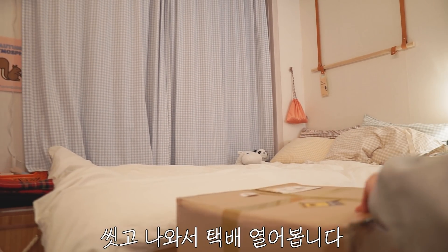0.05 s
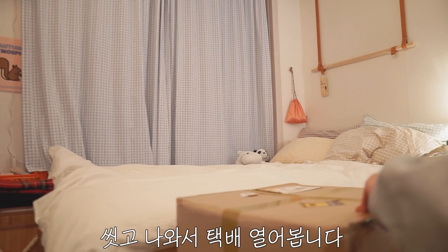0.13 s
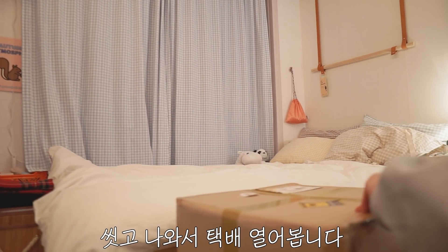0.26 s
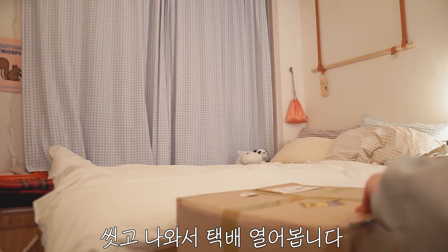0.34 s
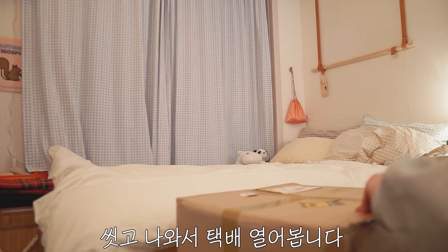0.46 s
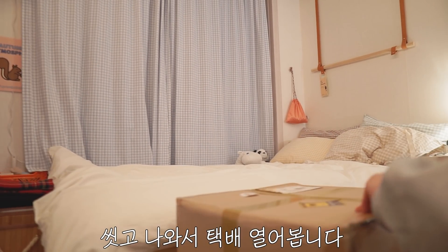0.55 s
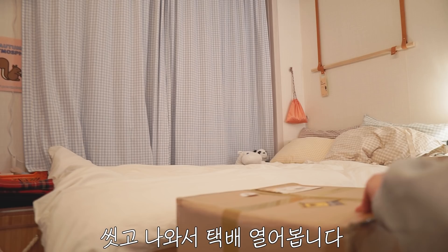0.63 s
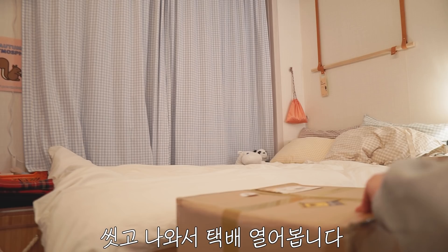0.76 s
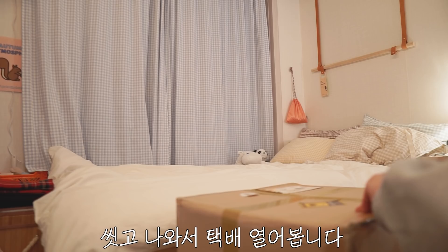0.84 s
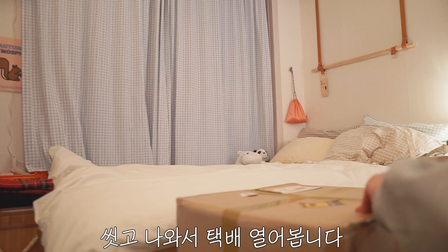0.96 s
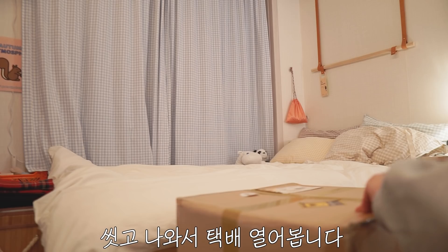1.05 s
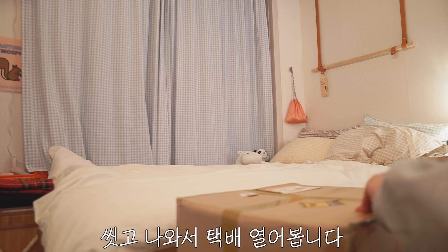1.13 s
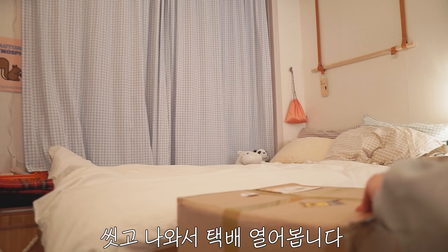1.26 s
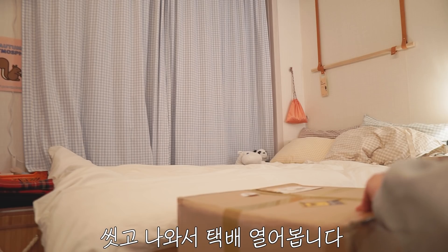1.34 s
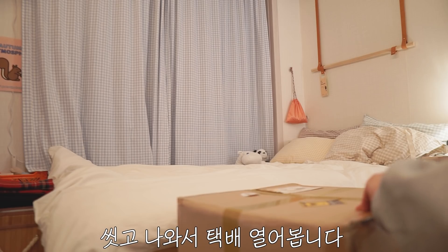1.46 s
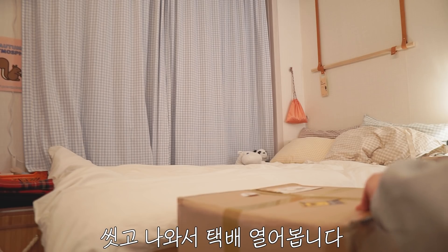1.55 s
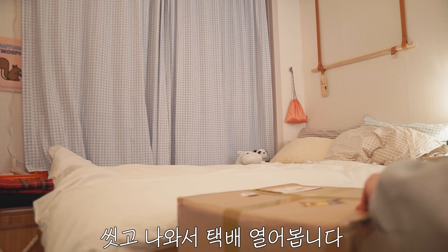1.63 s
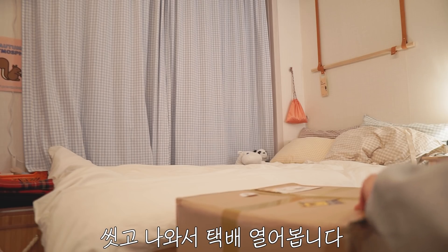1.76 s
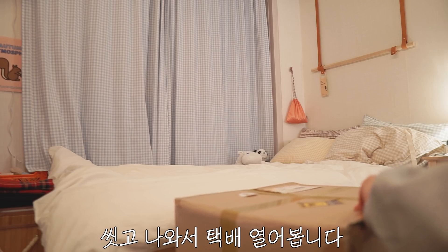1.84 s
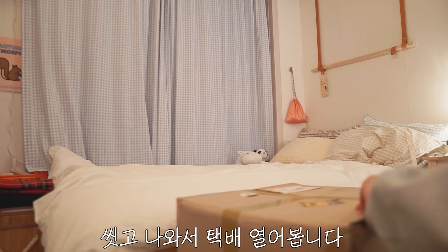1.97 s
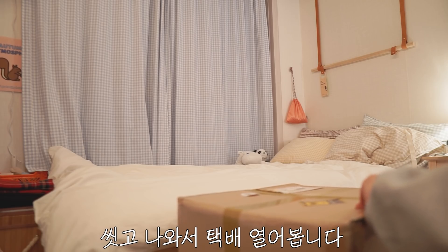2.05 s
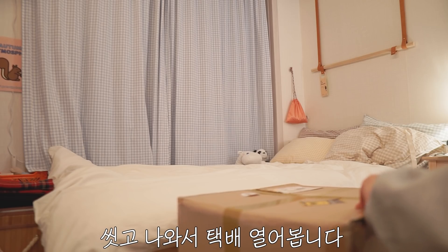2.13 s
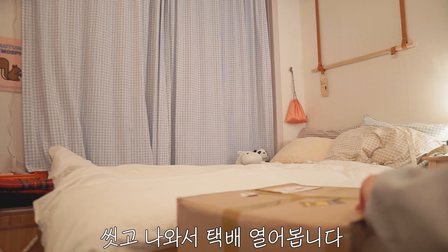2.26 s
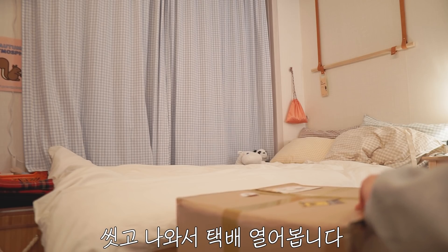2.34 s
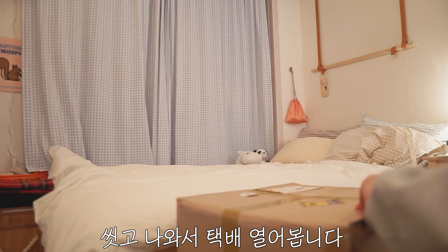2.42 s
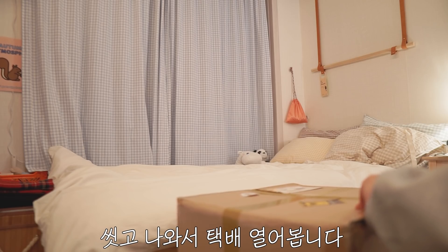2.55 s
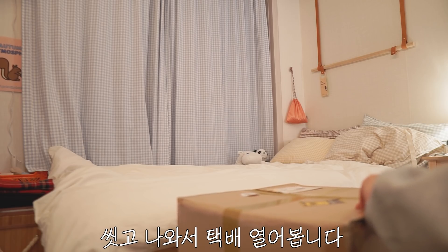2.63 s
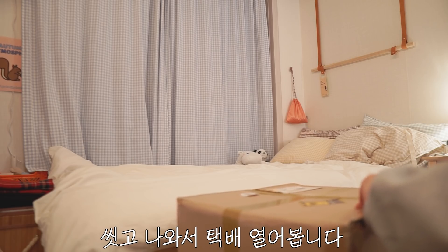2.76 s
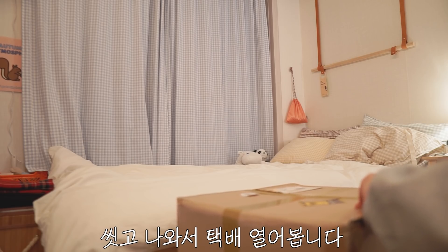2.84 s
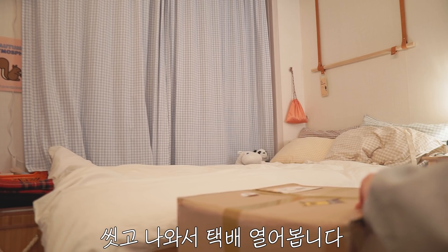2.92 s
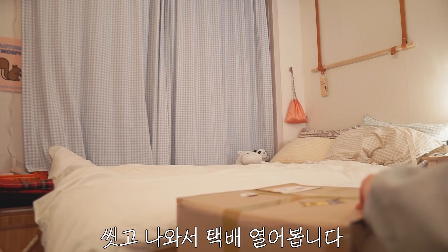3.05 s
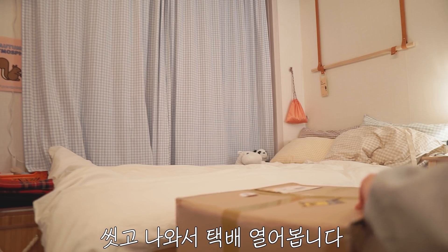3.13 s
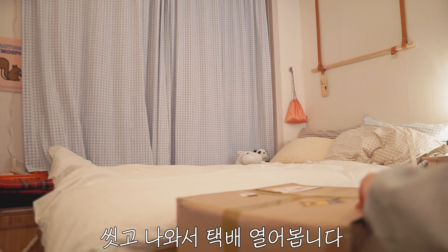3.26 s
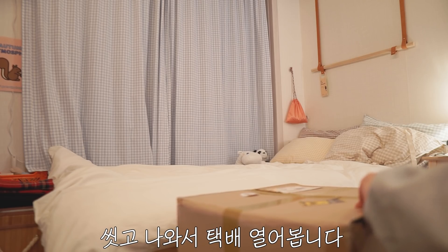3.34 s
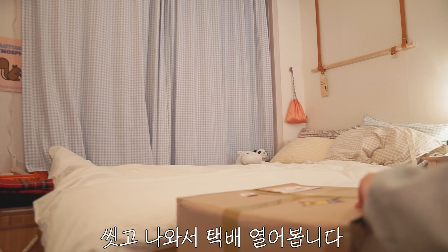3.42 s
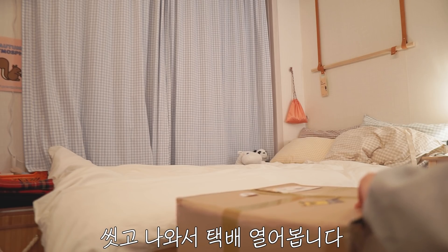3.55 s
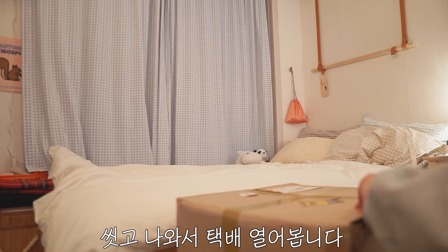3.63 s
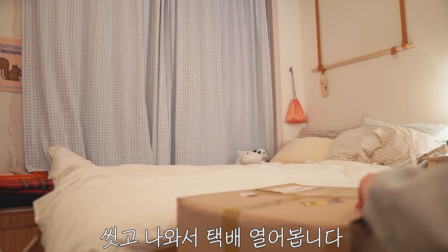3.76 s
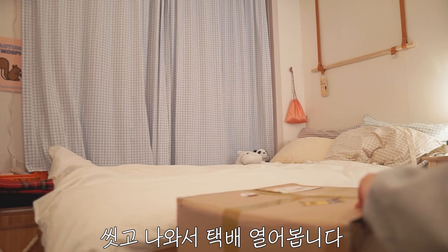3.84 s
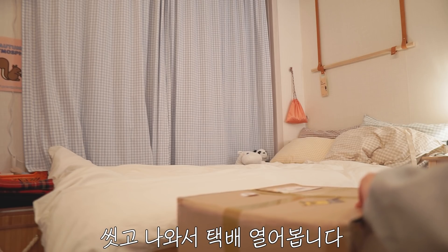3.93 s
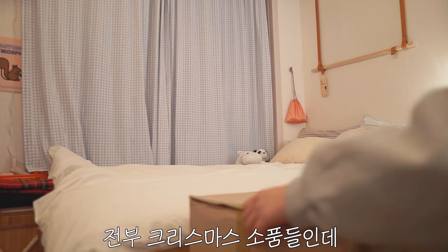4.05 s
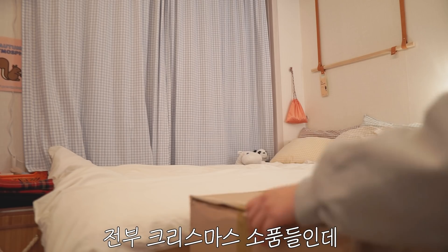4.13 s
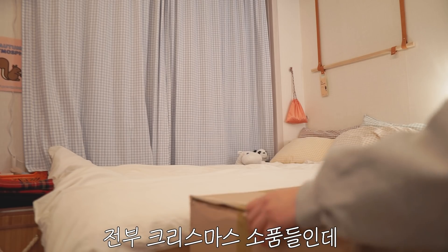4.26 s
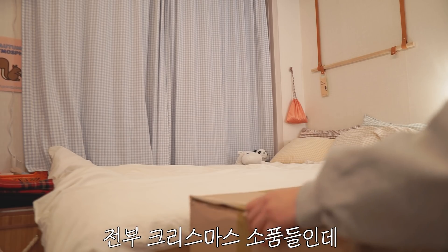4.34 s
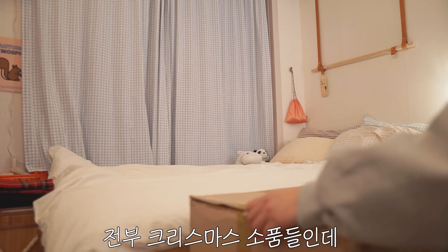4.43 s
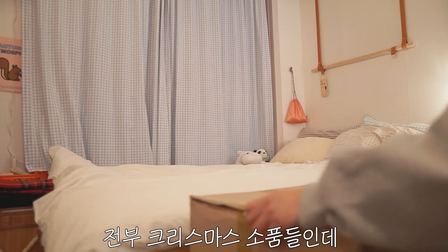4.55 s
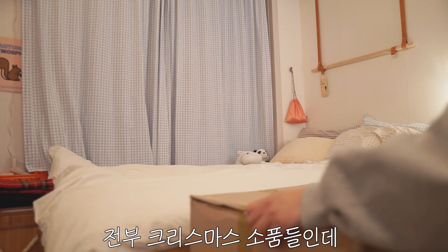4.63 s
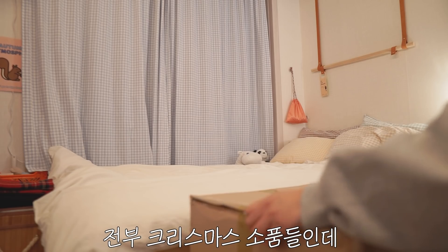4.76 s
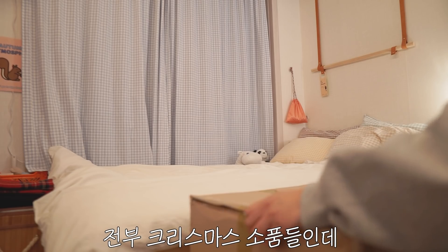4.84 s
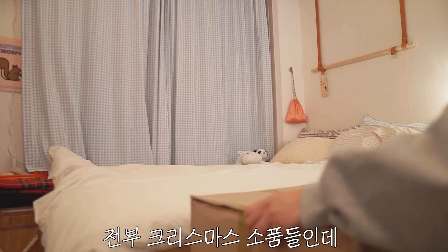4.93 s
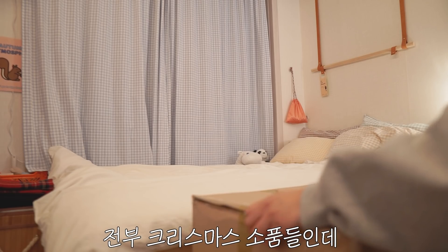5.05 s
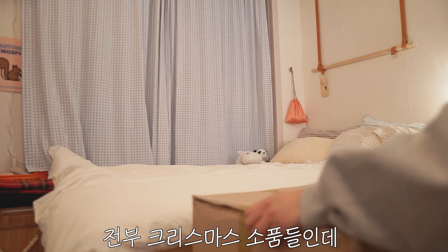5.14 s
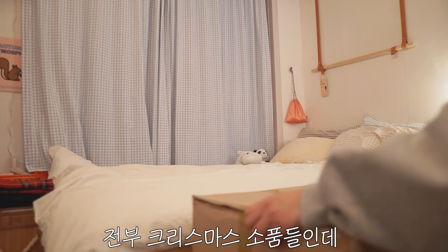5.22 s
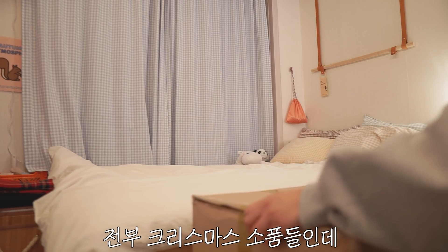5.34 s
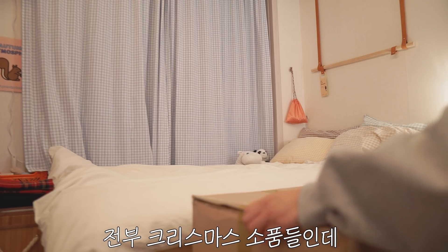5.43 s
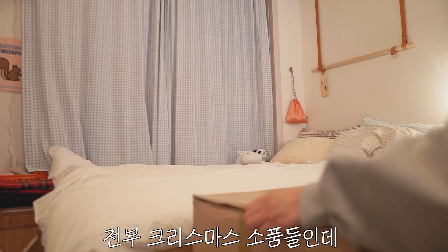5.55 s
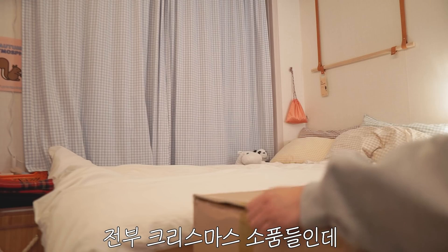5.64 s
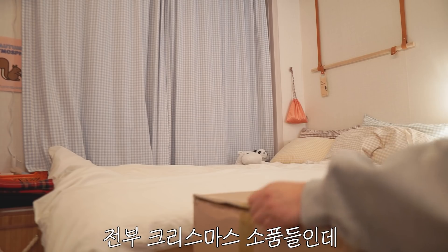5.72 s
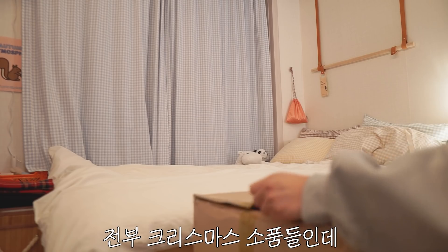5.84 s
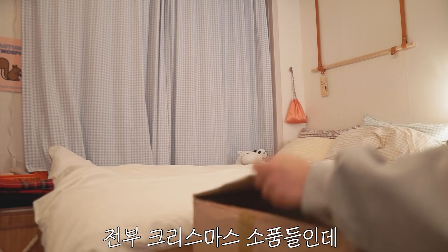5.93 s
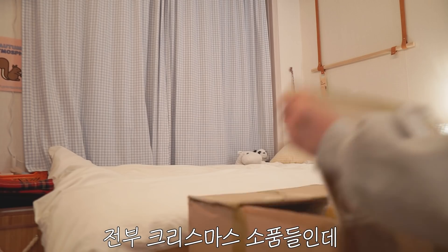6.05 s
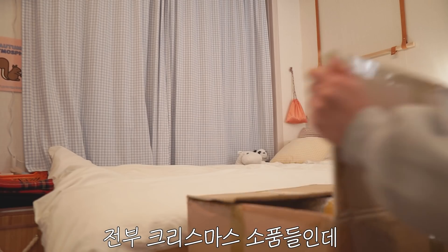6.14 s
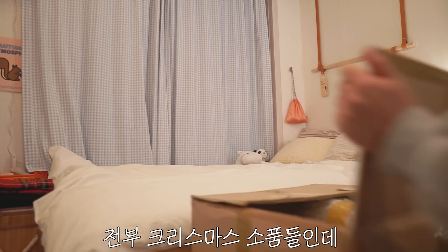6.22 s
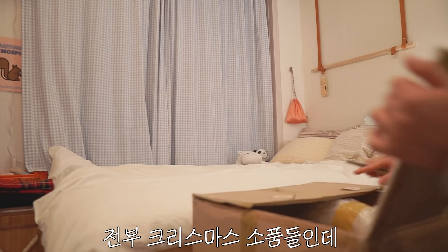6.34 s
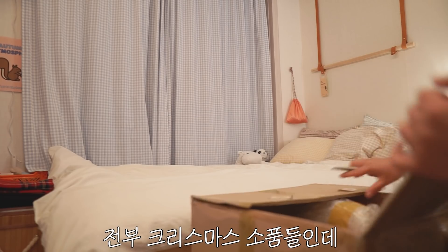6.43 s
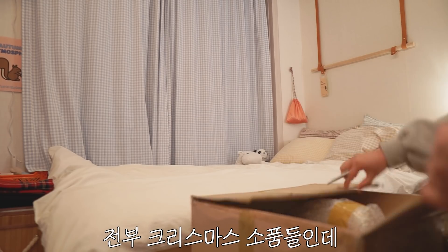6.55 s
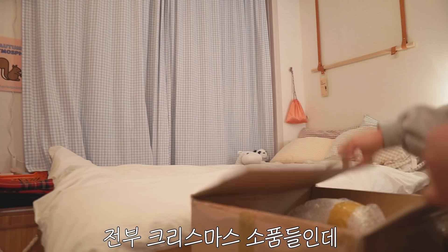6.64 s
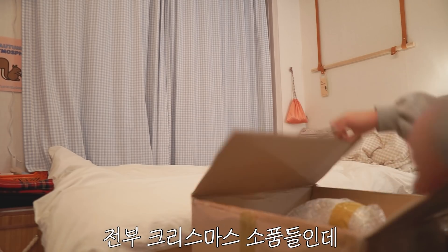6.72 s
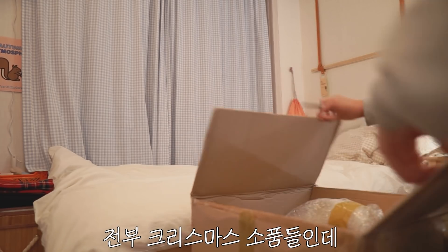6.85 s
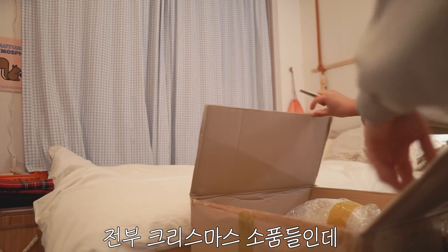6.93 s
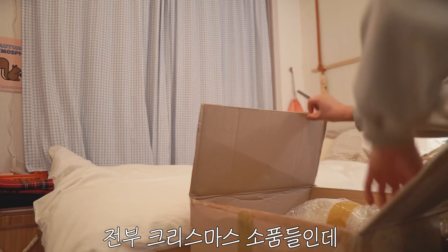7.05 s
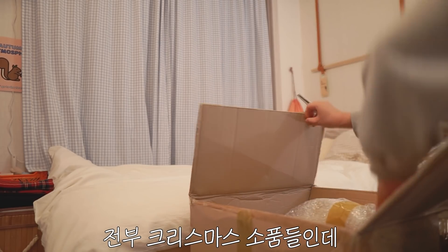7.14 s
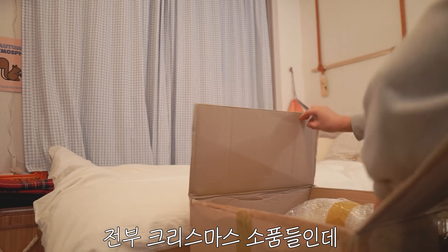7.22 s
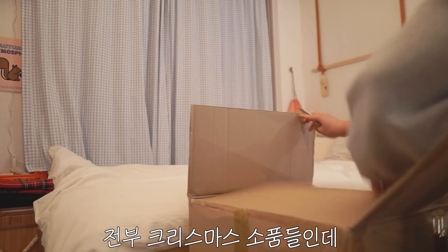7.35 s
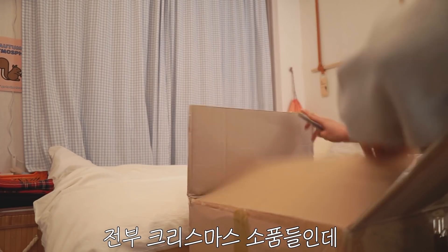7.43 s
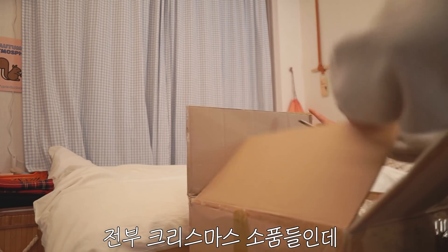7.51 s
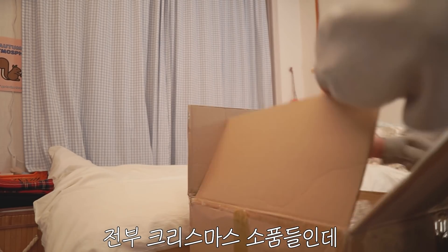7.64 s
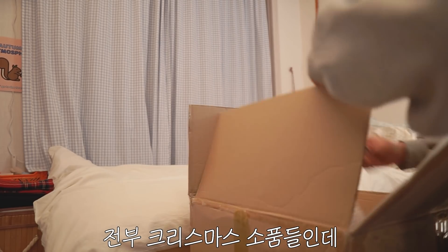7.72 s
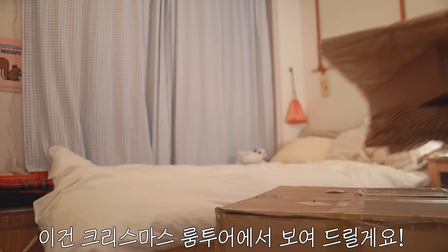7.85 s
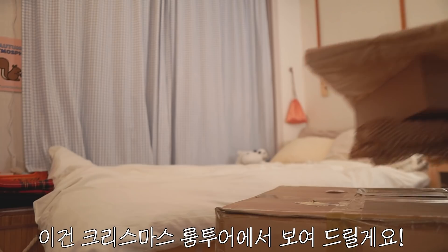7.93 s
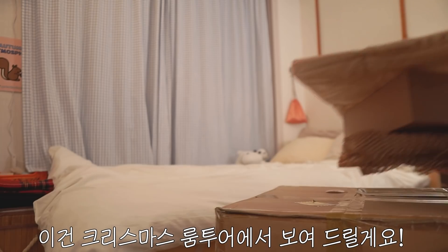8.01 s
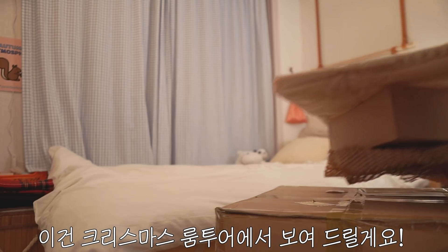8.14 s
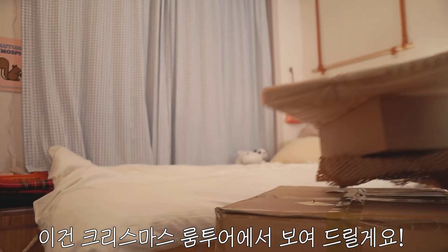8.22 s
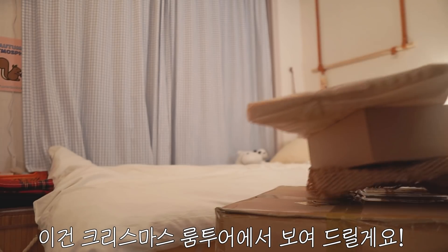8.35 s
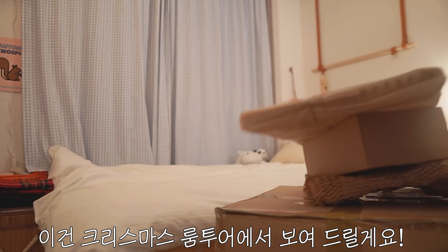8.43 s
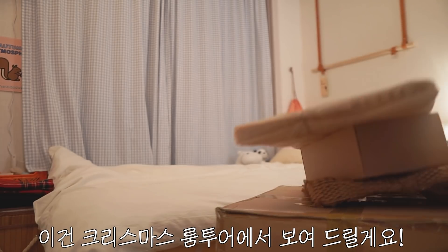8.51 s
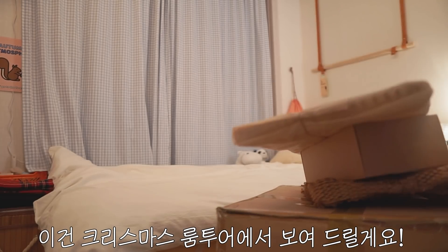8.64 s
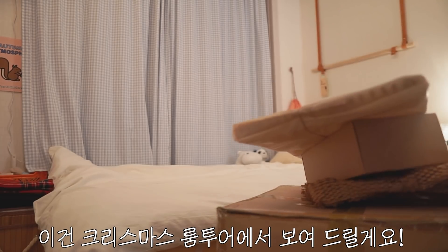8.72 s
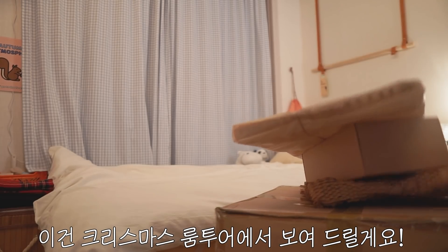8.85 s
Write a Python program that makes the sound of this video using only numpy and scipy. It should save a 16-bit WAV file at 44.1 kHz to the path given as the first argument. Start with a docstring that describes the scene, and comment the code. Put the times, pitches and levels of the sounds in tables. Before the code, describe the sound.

Close cardboard box opening: plastic clicks, scattered knocks and light rubbing, snapping fibres, hollow flap thumps, a loud board slide, then quiet crisp paper rustle.

```python
"""Cutting open a cardboard box

A taped box is cut open on a bed, close to a camera on whose right it stands: a knife's slider clicks out, tape and
fibres snap, flaps knock and boom, board slides on board; late on, tails stop at once and paper packing rustles.
Contacts are noise bursts through resonances, with wall echoes and a tail in a small soft room; rubbing is
gritty noise on drag curves; shaped noise makes the hush, with a faint quick ticking at two pitches."""
import sys
import numpy as np
from scipy import signal
from scipy.fft import rfft, irfft, next_fast_len
from scipy.io import wavfile
from scipy.ndimage import uniform_filter1d, map_coordinates

SR = 44100
rng = np.random.default_rng(int(sys.argv[2]) if len(sys.argv) > 2 else 0)


def unload_audio(sound):
    """Save the sound as a 16-bit wav file, at the path given as the first command line argument."""
    columns = np.transpose(np.atleast_2d(sound))
    # keep every value between -1 and 1, then stretch to whole-number steps
    steps = np.round(np.clip(columns, -1, 1) * 32767)
    wavfile.write(sys.argv[1], SR, steps.astype(np.int16))


N = 391608

# Resonances of the box and its air: [f/Hz, width/Hz, relative level/dB]
BODY_MODES = [(42, 18, -9.5), (136, 38, 4.5), (232, 55, 1.5), (299, 52, 4), (451, 230, -6)]
# Resonances of the flaps: [f/Hz, width/Hz, relative level/dB]
PANEL_MODES = [(567, 390, -0.5), (846, 93, 5), (1098, 344, -1), (1560, 1330, -12.5)]
# Resonances of the fibres: [f/Hz, width/Hz, relative level/dB]
FIBRE_MODES = [(7470, 3800, 14.5), (14750, 5200, 15)]


def amp(db):
    """Level definition: 20 dB for each factor of ten in amplitude."""
    return 10 ** (np.asarray(db) / 20)


def unit(x):
    """Normalization to unit root-mean-square amplitude."""
    return x / np.sqrt(np.mean(x ** 2) + 1e-20)


def along(points, hz):
    """Interpolation of (f/Hz, value) points on a logarithmic frequency axis."""
    f, value = np.transpose(points)
    return np.interp(np.log(hz + 1), np.log(f + 1), value)


def filtered(x, response):
    """Linear filtering: the spectrum of x times a complex response of frequency."""
    size = next_fast_len(N + SR // 2)
    spectrum = rfft(x, size) * response(np.fft.rfftfreq(size, 1 / SR))
    return irfft(spectrum, size)[..., :N]


def modes(table, order=1):
    """Modal superposition: causal resonances keeping white-noise power; a higher order steepens the skirts."""
    def response(f):
        h = 0
        for k, (centre, width, db) in enumerate(table):
            resonance = 1j * f * width / (centre * centre - f * f + 1j * f * width)
            h = h + (-1) ** k * amp(db) * resonance  # alternate signs
        return h ** order / np.sqrt(np.mean(np.abs(h) ** (2 * order)))
    return response


def wobble(rate):
    """Slow modulation: a smooth random curve with rate knots a second."""
    knots = rng.standard_normal(int(N * rate / SR) + 4)
    return map_coordinates(knots, [np.arange(N) * rate / SR])


def hush():
    """Filtered noise: a shaped, gently wavering hush, with impulses exciting two resonances as ticks."""
    # Spectrum of the hush: [f/Hz, relative level per Hz/dB]
    air_spectrum = [(15, -49), (25, -18), (137, 4.5), (223, -10.5), (405, -9), (911, -7), (1480, -13),
                    (2000, -11.5), (2350, -19), (2550, -7.5), (2840, -17.5), (14000, -27), (16000, -30)]
    # Low tick resonance: [f/Hz, width/Hz, relative level/dB]
    low_mode = [(2060, 310, 0)]
    # High tick resonance: [f/Hz, width/Hz, relative level/dB]
    high_mode = [(2570, 140, 0)]
    # Onsets of the stronger high ticks: [t/s]
    tick_times = [0.3707, .392, .4519, .4804, .6868, 2.1035, 2.1864, 2.271, 2.52, 3.442, 3.7875]
    air = unit(filtered(rng.standard_normal((2, N)), lambda hz: amp(along(air_spectrum, hz))))
    air_db = -59 + 0.94 * wobble(2.7)
    # Random ticks: about 20 low and 3 high a second; the low ones are uneven in level
    scatter_db = 3 * rng.standard_normal(N)
    low = (rng.random(N) < 20 / SR) * amp(-37 + scatter_db)
    high = (rng.random(N) < 3 / SR) * amp(-51)
    high[np.round(np.multiply(tick_times, SR)).astype(int)] = amp(-32.5)
    ticking = filtered(low, modes(low_mode)) + filtered(high, modes(high_mode, order=2))
    return amp(air_db) * air + ticking * [[1], [.6]]


def strikes(times, levels_db, hard_db, crack, t60, room_db, rise, spots_hz=None, sharp=4):
    """Impact and reverberation: a short crack, its wall echoes and a decaying tail, as mid and side noise.

    crack and t60 are the times in s for the crack and the tail to fall by 60 dB.
    """
    # Reflections off near walls: [delay t/s, level re crack/dB]
    reflections = [(.0078, -6), (.012, -9), (.0165, -9), (.027, -12)]
    tails_stop = 7.92  # s; contacts before this are silenced here, echoes and all
    out, t = np.zeros((2, N + SR)), np.arange(int(.4 * SR)) / SR
    crack_decay = amp(-60 * t / crack)
    tail_decay = amp(room_db - 60 * t / t60)
    for k, (s, db) in enumerate(zip(times, levels_db)):
        start = round(s * SR)
        keep = len(t) if s > tails_stop else min(len(t), round(tails_stop * SR) - start)
        noise = rng.standard_normal((3, len(t)))
        # Hardness strengthens the crack and quickens the swell of the tail
        blow = amp(hard_db[k]) * np.sign(noise[2]) * crack_decay
        swell = 1 - np.exp(-t * amp(0.63 * hard_db[k]) / rise)
        sound = noise[:2] * tail_decay * swell + blow * [[1], [0]]
        for n, (delay, echo_db) in enumerate(reflections):  # walls answer from alternate sides
            sound += amp(echo_db) * np.roll(blow, round(delay * SR)) * [[1], [(-1) ** n]]
        if spots_hz is not None:  # the struck spot rings in one band of its own
            gain = np.sqrt(SR * sharp / (np.pi * spots_hz[k]))
            b, a = signal.iirpeak(spots_hz[k], sharp, SR)
            sound = gain * signal.lfilter(b, a, sound)
        out[:, start:start + keep] += amp(db) * sound[:, :keep]
    return out[:, :N]


def snaps():
    """Impulsive excitation of plastic: very short clicks with little bass, so wall echoes stand apart."""
    # Plastic clicks: [t/s, push level/dB, crisp top re push/dB, hardness/dB]
    clicks = [(0.0034, -19, -2.5, 1.5), (0.0841, -19.5, -2.5, 3.5), (0.168, -19.5, -3, 3),
              (5.7278, -13, -9, 3), (5.781, -17.5, -5, 4), (5.824, -16, -5, 2), (5.8602, -12.5, -10, 4.5),
              (5.915, -10, -9, 3.5), (8.4251, -24, -12.5, 9)]
    # Resonances of the plastic: [f/Hz, width/Hz, relative level/dB]
    plastic_modes = [(2665, 480, 3.5), (3210, 213, 9), (3950, 1340, 3.5), (6600, 1650, 1)]
    s, db, top, hard = np.transpose(clicks)
    click = .004  # s to fall by 60 dB
    ring = strikes(s, db + 1.5, hard, crack=click, t60=0.23, room_db=-14.5, rise=0.0027)
    crisp = strikes(s, db + top + 2.5, hard, crack=click, t60=0.21, room_db=-12.0, rise=0.003)
    return filtered(ring, modes(plastic_modes, order=2)) + filtered(crisp, modes(FIBRE_MODES, order=2))


def contacts():
    """Modal excitation: each contact drives five parts; lower parts are pushed longer and mostly ring longer."""
    # Contacts on the box: [t/s, push level/dB, boom re push/dB, crisp top re push/dB, struck spot f/Hz,
    # hardness/dB]
    hits = [(0.282, -35, -21, -28, 3720, -1.5), (0.435, -43, -28, -22, 4090, -1),
            (0.505, -33, -14.5, -10.5, 3770, 1.5), (0.857, -26.5, -36, -12.5, 2220, -4.5),
            (1.189, -32.5, -25, -47, 1280, -1), (1.237, -34, -14.5, -21, 886, -8),
            (1.35, -26.5, -15, -37, 1270, -1), (1.492, -49, -16, 8, 790, -3),
            (1.526, -30, -21, -11.5, 2100, 0.5), (1.627, -38, -12, -5, 2520, -2),
            (1.738, -27, -10, -3, 1100, -7.5), (1.779, -15.5, -6, -23.5, 2350, -4),
            (1.901, -27, -5, -20, 805, -6), (2.356, -39, -24, -31, 630, 1.5),
            (2.522, -44, -5.5, -20, 813, -11), (2.768, -23, -15.5, -21, 1070, 1.5),
            (2.88, -21.5, -23, -14.5, 830, 0), (2.964, -25.5, -9, -33, 1300, -17),
            (3.171, -19, -13, -4.5, 1190, -3.5), (3.178, -18, -45, -10, 2320, 4),
            (3.32, -40, -17, -8, 2350, -7), (3.482, -29.5, -17.5, -26, 1220, -1),
            (3.609, -38.5, -16, -23, 4000, -7), (3.633, -28, -20, -27, 1180, -1.5),
            (3.884, -36.5, -19, -51, 1200, -1), (4.121, -38, -15, -18, 920, 1.5),
            (4.315, -39.5, -48, -12, 2660, 0.5), (4.403, -39.5, -32, -30, 3190, 3),
            (4.5, -26.5, -32, -2.5, 1960, -8), (4.582, -25.5, -25, -24, 880, 6),
            (4.623, -29, -11.5, -42, 840, 1.5), (4.804, -28, -27, -11.5, 756, -12),
            (4.911, -24.5, -15.5, -21, 706, 3.5), (4.953, -28, -35, -35, 2610, 3.5),
            (5.163, -23.5, -7, -12, 586, -5.5), (5.26, -14.5, -12.5, -31, 950, -8),
            (5.367, -14.5, -17, -33, 750, -6.5), (5.593, -20.5, -14, -20, 800, 2),
            (5.667, -22.5, -28, -36, 1800, 4), (5.861, -24, -7.5, -4.5, 766, 6),
            (5.947, -14, -1, -7, 800, -2.5), (5.96, -16.5, -26, -1.5, 630, -4),
            (6.029, -13, 1, -12.5, 805, -6.5), (6.134, -24, 1.5, -16, 780, 4.5),
            (6.263, -25.5, -11, -19, 795, -16), (6.527, -37, -15, -2.5, 1380, 4.5),
            (6.612, -22.5, -11, -33, 690, 2), (6.797, -27, -11, -29, 4370, 0.5),
            (6.903, -28, -7, -19, 1550, -6.5), (7.262, -32, -10, -10.5, 4400, -3),
            (7.289, -41.5, 2.5, -23, 603, 4.5), (7.404, -9, -5, -36, 1540, -8),
            (7.455, -13, -8, -5.5, 3860, -4), (7.581, -20, -11, 2.5, 2060, -6),
            (8.001, -47, -28, -8, 880, 0), (8.511, -35, -4, -15, 2160, 3)]
    # Resonances of tape and board edges: [f/Hz, width/Hz, relative level/dB]
    edge_modes = [(1997, 1010, 3.5), (3400, 930, 7.5), (4236, 1740, 8), (5620, 4800, 1)]
    s, db, boom, top, hz, hard = np.transpose(hits)
    rap = -7 + 0.15 * boom  # the panels answer a share of the boom
    bite = .3 * top  # a dull contact also wakes the edges less
    snap = .005  # s for the crack at edge and fibres to fall by 60 dB
    spot_db = np.where(hz < 1900, db - 6.5, db - 8.5)
    body = strikes(s, db + boom + 0.5, hard, crack=0.05, t60=0.29, room_db=-4.5, rise=0.0033)
    panel = strikes(s, db + rap - 6.5, hard, crack=0.037, t60=0.32, room_db=-5.0, rise=0.0051)
    spot = strikes(s, spot_db, hard, crack=0.016, t60=0.22, room_db=-8, rise=0.0016, spots_hz=hz, sharp=3.8)
    edge = strikes(s, db + bite + 3.5, hard, crack=snap, t60=0.22, room_db=-12, rise=0.0035)
    crisp = strikes(s, db + top + 7.5, hard, crack=snap, t60=0.18, room_db=-13, rise=0.0056)
    low = filtered(body, modes(BODY_MODES)) + filtered(panel, modes(PANEL_MODES))
    high = filtered(edge, modes(edge_modes, order=2)) + filtered(crisp, modes(FIBRE_MODES, order=2))
    return low + spot + high


def grit(rate, spread_db, life, grains_db):
    """Stick-slip friction: smooth noise made rough by uneven slips, rate a second, falling 60 dB in life s."""
    sizes_db = spread_db * np.minimum(rng.standard_exponential(N), 3)
    slips = (rng.random(N) < rate / SR) * amp(sizes_db)
    t = np.arange(SR // 20) / SR
    bumps = unit(signal.fftconvolve(slips, amp(-60 * t / life))[:N])
    return unit(rng.standard_normal((2, N)) * (1 + amp(grains_db) * bumps))


def patches(x, depth_db):
    """Time-varying coupling: the contact wanders over the board, so bands swell and fade by chance."""
    z = signal.stft(x, nperseg=512)[2]
    field = rng.standard_normal(z.shape[1:])
    field = uniform_filter1d(field, size=7, axis=0)  # smooth over frequency
    field = uniform_filter1d(field, size=9, axis=1)  # smooth over time
    return signal.istft(z * amp(depth_db * unit(field)), nperseg=512)[1][:, :N]


def friction(tables, rough_db, grains_db, crackle_db, body_db, panel_db, fibre_db):
    """Friction-driven vibration: one drag curve shakes body and panels, scrapes board and frays fibres."""
    # Spectrum of the scrape: [f/Hz, relative level per Hz/dB]
    scrape_spectrum = [(760, -8.5), (1300, -0.5), (2130, 3.5), (3510, -2), (4170, -2), (4830, -6),
                       (6000, -7), (7800, -14), (13200, -120)]
    # Spectrum of the fraying fibres: [f/Hz, relative level per Hz/dB]
    fizz_spectrum = [(2650, -27.5), (4500, 1.5), (4920, -10.5), (7030, -5.5), (8200, -2), (13900, -5.5),
                     (16000, -8)]
    off, edge = -110, .0001  # dB between bouts; s to switch
    bouts = [[(t[0][0] - edge, off, 0), *t, (t[-1][0] + edge, off, 0)] for t in tables]
    rows = np.concatenate(bouts)
    scrape_db, weight_db = (np.interp(np.arange(N) / SR, rows[:, 0], c) for c in rows[:, 1:].T)
    rumble_db = scrape_db + body_db + weight_db
    groan_db = scrape_db + panel_db + 0.83 * weight_db  # panels take a share of the weight
    fizz_db = scrape_db + fibre_db + 0.26 * (scrape_db + 43)  # fizz outgrows the scrape
    drag = amp(rough_db * (wobble(25) + 0.17 * wobble(70)))
    rumble = unit(filtered(grit(45, 1.6, 0.078, grains_db), modes(BODY_MODES)))
    groan = unit(filtered(grit(120, 4.1, 0.0088, grains_db), modes(PANEL_MODES, order=2)))
    rasp = patches(grit(150, 4, 0.017, grains_db), depth_db=3)
    scrape = unit(filtered(rasp, lambda hz: amp(along(scrape_spectrum, hz))))
    fibres = grit(200, 5, .006, grains_db)
    fibres += amp(crackle_db) * grit(35, 4.7, 0.0056, 5.9)  # a few break sharply
    fizz = unit(filtered(fibres, lambda hz: amp(along(fizz_spectrum, hz))))
    low = amp(rumble_db) * rumble + amp(groan_db) * groan
    high = amp(scrape_db) * scrape + amp(fizz_db) * fizz
    return drag * (low + high)


def handling():
    """Rough sliding friction: hands and board rub in bouts with a strongly uneven drag."""
    # One curve for each bout: [t/s, scrape level/dB, weight/dB]
    rubs = [
        [(1.18, -70, 0), (1.382, -55.5, 2), (1.636, -68.5, -2), (1.87, -45, 9), (2.076, -55.5, -3),
         (2.15, -67, 2)],
        [(2.72, -58.5, 1), (2.796, -49.5, 3.5), (2.932, -52, 5), (3.15, -60, 3)],
        [(3.75, -65.5, 4), (3.902, -66.5, 8), (4.1, -65.5, 2), (4.122, -51.5, 2.5), (4.366, -63, -3),
         (4.6, -43.5, -9), (4.676, -55, 8.5), (4.962, -45, 5), (5.034, -47.5, 3), (5.288, -41, 3),
         (5.33, -45, 6.5), (5.42, -38, 7.5), (5.58, -52.5, -1)],
        [(5.583, -48, -1), (5.68, -46.5, 4), (5.84, -24, -8), (5.93, -46.5, 3), (6.03, -34, 2), (6.2, -45, -2),
         (6.42, -47.5, -1), (6.6, -47.5, 3), (6.74, -54, -2), (6.9, -50, 1), (7.0, -37.5, 1), (7.07, -52, -2.5),
         (7.22, -52.5, -6), (7.3, -47.5, 0)],
    ]
    return friction(rubs, rough_db=3.0, grains_db=-7.0, crackle_db=-5.5, body_db=-5, panel_db=-6, fibre_db=-7.5)


def crackles():
    """Brittle fracture: single fibres break as dry bright ticks that hardly wake the room."""
    # Breaking fibres: [t/s, push level/dB]
    breaks = [(4.634, -48), (4.6978, -35), (5.6064, -40), (5.6467, -17), (5.693, -33), (6.459, -21.5),
              (6.65, -26), (6.757, -31), (8.4068, -35), (8.544, -21.5), (8.6326, -19.5), (8.7046, -22.5),
              (8.7693, -26), (8.796, -23.5), (8.829, -17.5)]
    s, db = np.transpose(breaks)
    ticks = strikes(s, db - 1.5, 0 * s, crack=0.0018, t60=0.21, room_db=-21, rise=0.00093)
    return filtered(ticks, modes(FIBRE_MODES, order=2))


def slide():
    """Surging sliding friction: board slides briefly and loudly on board, in uneven surges."""
    # Curve of the slide: [t/s, scrape level/dB, weight/dB]
    stroke = [(7.28, -57, -12), (7.316, -49, -6), (7.336, -36.5, 4.5), (7.432, -30, 3), (7.442, -36, 6),
              (7.514, -20, -17), (7.566, -37, -10), (7.608, -26, -15), (7.826, -28, -29),
              (7.906, -35, -7.5), (7.92, -41.5, -12)]
    return friction([stroke], rough_db=0.0, grains_db=-16, crackle_db=-9, body_db=-5.5, panel_db=-4.5,
                    fibre_db=-4.0)


def paper():
    """Light sliding friction: paper packing rustles with little random roughness in its drag."""
    # Curve of the rustle: [t/s, scrape level/dB, weight/dB]
    rustle = [(7.925, -55.5, 0), (8.171, -61, 0), (8.391, -55, 0), (8.475, -48, 0), (8.601, -40.5, 0),
              (8.88, -45.5, 0)]
    return friction([rustle], rough_db=.9, grains_db=-10, crackle_db=-4, body_db=-4, panel_db=-5.5,
                    fibre_db=-6.5)


def spread(both, lead):
    """Stereo level and time cues: mid and side become two ports, most alike in the bass; left leads by lead s."""
    # Likeness of the ports: [f/Hz, left-right correlation]
    likeness = [(140, .999), (250, 0.99), (500, 0.79), (1000, 0.53), (2000, 0.72), (4000, 0.14),
                (8000, 0.24)]
    # Balance of the ports: [f/Hz, left re right level/dB]
    balance = [(130, 0), (250, -0.5), (500, -2.5), (1000, -4.5), (2000, -3), (8000, -3)]
    half = np.array([[.5], [-.5]])  # each port takes half of the difference

    def width(hz):
        return np.tan(np.arccos(np.clip(along(likeness, hz), -.9, 1)) / 2)

    def ports(hz):
        return amp(along(balance, hz) * half) * np.exp(2j * np.pi * hz * lead * half)

    mid, side = both[0], filtered(both[1], width)
    return filtered(np.array([mid + side, mid - side]), ports)


def scene():
    """Superposition: rubbing, from the box's whole width, has no lead; all else reaches the right port first."""
    lead = -0.000086  # s by which left leads; negative, so right is first
    right_first = contacts() + snaps() + crackles() + hush() + paper()
    return spread(right_first, lead) + spread(handling() + slide(), 0)


def record(dry):
    """Band limiting: the camera keeps nothing from 15750 Hz up."""
    return filtered(dry, lambda hz: hz < 15750)


dry = scene()
out = record(dry)
unload_audio(out)
```